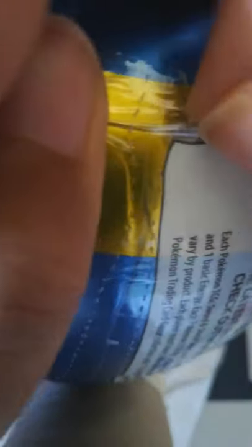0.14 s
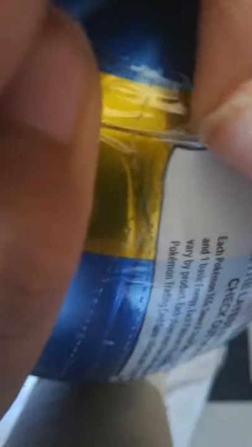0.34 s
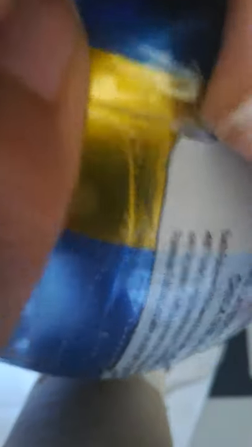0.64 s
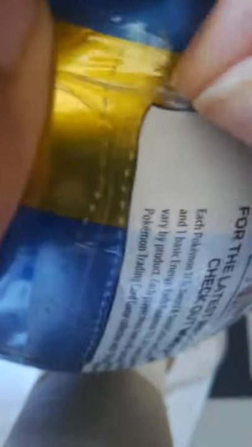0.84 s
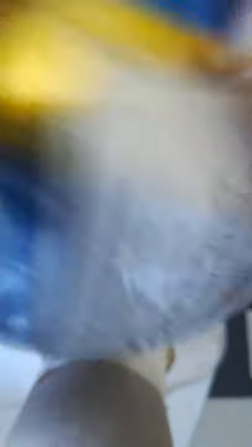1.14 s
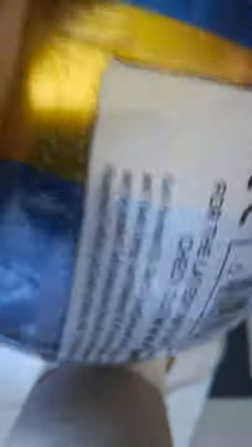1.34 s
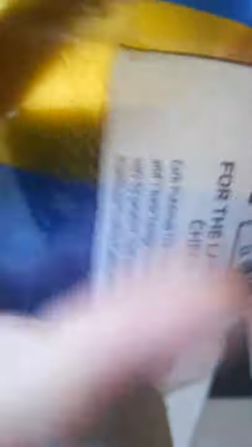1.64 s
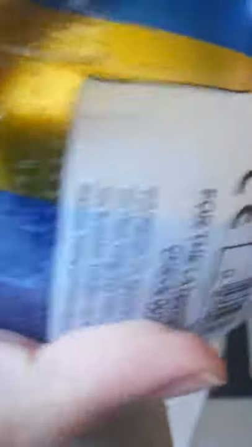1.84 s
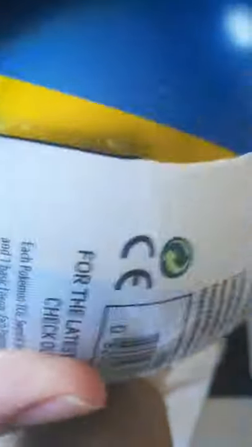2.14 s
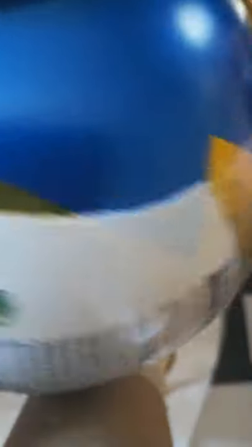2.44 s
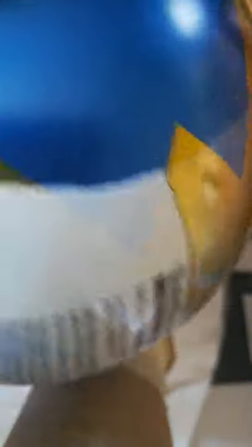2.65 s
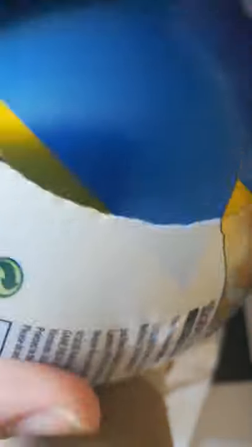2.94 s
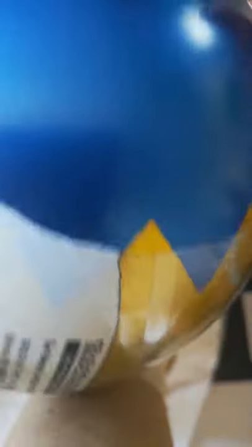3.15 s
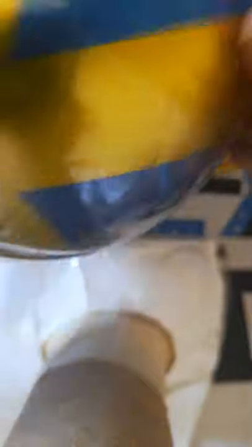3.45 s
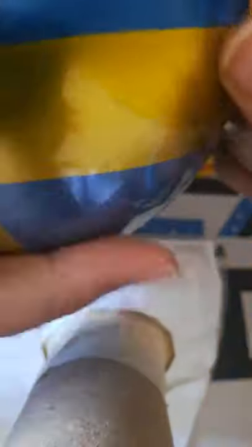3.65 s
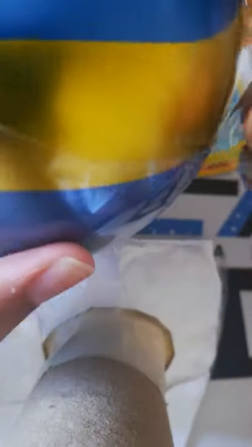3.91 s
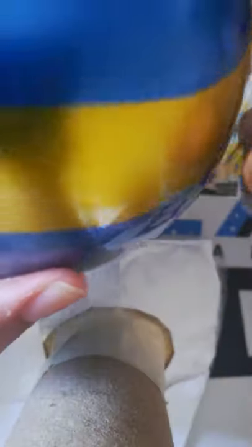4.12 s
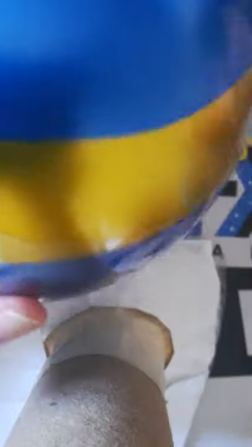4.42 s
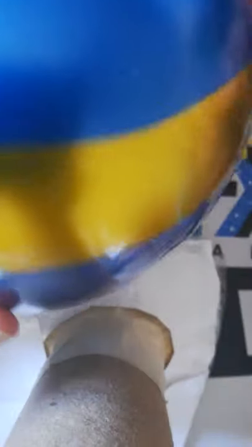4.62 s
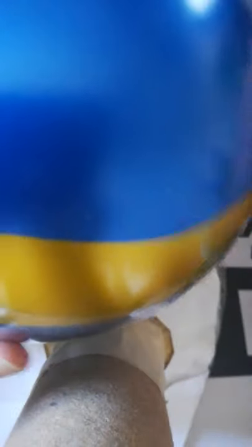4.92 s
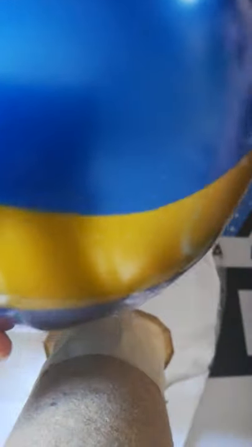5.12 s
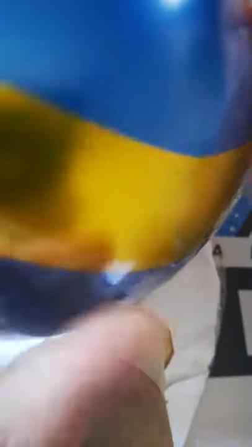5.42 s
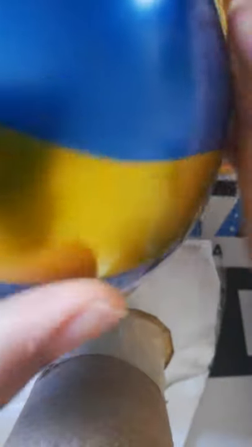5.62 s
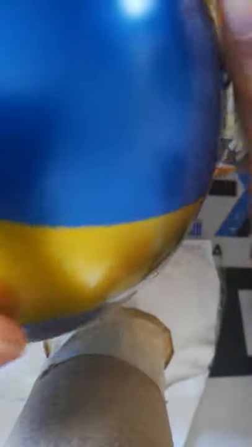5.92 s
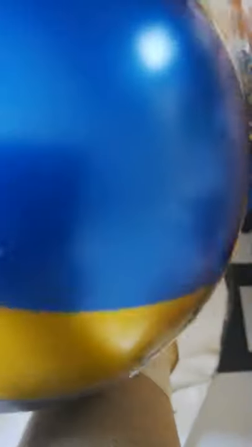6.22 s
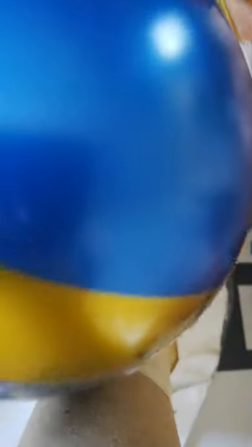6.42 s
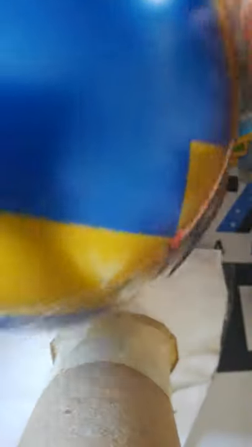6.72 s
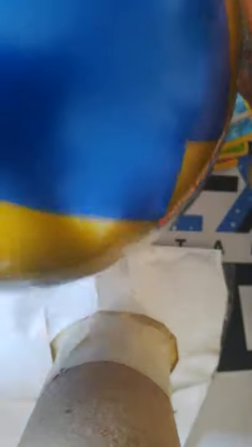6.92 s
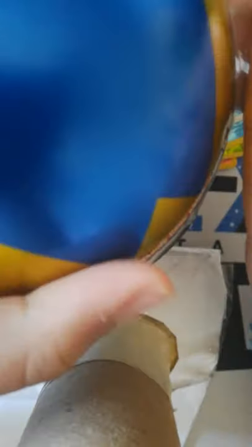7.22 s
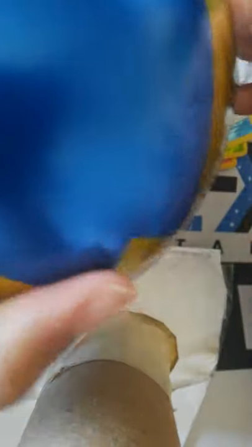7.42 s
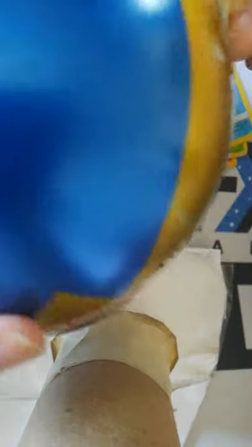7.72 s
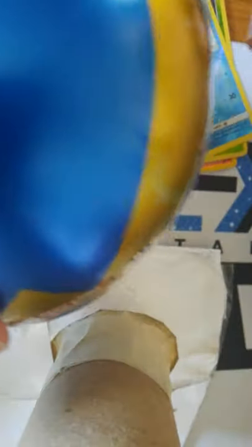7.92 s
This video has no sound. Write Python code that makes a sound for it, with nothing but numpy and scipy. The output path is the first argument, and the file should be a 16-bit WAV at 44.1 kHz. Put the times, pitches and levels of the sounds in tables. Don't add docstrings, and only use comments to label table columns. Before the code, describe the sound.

A close stereo pickup in a small room, with quiet air, faint low hum and grip rumble throughout. For the first second there are only tiny ticks and one clear snap near 0.6 s. At 1.2 s the film starts to give with sharp dry cracks, another at 1.5, then a strong cluster at 2.1 to 2.5. Faint squeaks of film on metal follow around 2.4 to 2.7, light shell taps at 2.8 to 2.9, and more crackle at 3.4 to 3.8. A hard burst at 4.2 brings short squeaks to 4.5; snaps keep coming from 4.8 to 5.9, one very loud at 5.45. From 6.05 to 6.9 the wrap crumples densely, with brief hollow tin rings and clanks. After a lull, bright crackling returns at 7.3, with loud snaps and a low thud at 7.6, and a last burst near 7.9.

```python
import sys
import numpy as np
from scipy import signal
from scipy.fft import rfft, irfft, next_fast_len
from scipy.io import wavfile
from scipy.ndimage import uniform_filter1d

SR = 44100
rng = np.random.default_rng(int(sys.argv[2]) if len(sys.argv) > 2 else 0)


def rack_gain(trim_db):
    fader = np.asarray(trim_db, float)
    return 10 ** (fader / 20)


def unload_wav(signal):
    wavfile.write(
        sys.argv[1],
        SR,
        np.round(np.clip(np.atleast_2d(signal).T, -1, 1) * 32767).astype(np.int16),
    )


N = 355446
SIZE = 1024
USUAL_MID_DB, USUAL_LOW_DB = -6, -9

# hz, level_db
FILM = [(240, -19), (400, -17.5), (681, -15), (835, -8), (1690, -9), (2140, -6.5), (2700, -6.5),
        (4000, -4.5), (4390, -3), (6100, -4), (7240, 3), (9450, -6.5), (11100, -17), (15100, -19.5),
        (16900, -61)]
# start_s, mid_db, low_db, left_minus_right_db
TURN = [(1.201, -15.5, -12, 8), (3.1, -7, -14, 1.5), (3.501, -14, -20, 5), (4.5, -6, -13, -9),
        (5.3, 0.5, -19.5, 1), (6.7, -7, -17, -5.5), (7.6, -10.5, -8.5, 6)]


def shape(hz, table):
    table_hz, table_db = np.transpose(table)
    return np.interp(np.log(hz + 1), np.log(table_hz), table_db)


def colour(x, table):
    length = x.shape[-1]
    n = next_fast_len(length)
    gain = rack_gain(shape(np.fft.rfftfreq(n, 1 / SR), table))
    y = irfft(rfft(x, n) * gain, n)[..., :length]
    return y / np.sqrt(np.mean(y ** 2))


def causal(db):
    fold = np.r_[1, 2 * np.ones(SIZE // 2 - 1), 1, np.zeros(SIZE // 2 - 1)]
    cepstrum = irfft(db * np.log(10) / 20, SIZE)
    return np.exp(rfft(cepstrum * fold))


def add(out, s, sounds):
    for start, sound in zip((s * SR).astype(int), sounds):
        n = min(sound.shape[-1], N - start)
        out[:, start:start + n] += sound[:, :n]


def walk(rate):
    k = int(SR / rate)
    held = np.repeat(rng.standard_normal(N // 200), k)[:N]
    return 1.88 * uniform_filter1d(held, k)


def ringing(modes, flicker_db, rate):
    n = next_fast_len(N)
    hz, noise = np.fft.rfftfreq(n, 1 / SR), rfft(rng.standard_normal(N), n)
    y = np.zeros(N)
    for mode_hz, width_hz, db in modes:
        resonance = 1 / (1 + (2 * (hz - mode_hz) / width_hz) ** 2)
        y += rack_gain(db + flicker_db * walk(rate)) * irfft(noise * resonance, n)[:N]
    return y / np.sqrt(np.mean(y ** 2))


def hands():
    # (time to die by 20 dB
    tugs = [(.485, -55, -0.05), (1.216, -38.5, -0.08), (1.3, -54, -0.06), (1.7, -59, -0.15),
            (1.93, -76, -2), (2.102, -44.5, 0.1), (2.28, -53, 0.4), (2.551, -62, 0.2), (2.95, -55.5, 0.5),
            (3.127, -44.5, 0.1), (3.369, -40.5, -0.05), (3.43, -49, 0.1), (3.521, -48.5, 0.3),
            (3.74, -70, 0.1), (4.25, -48.5, 0.36), (4.441, -39.5, 0.08), (4.6, -68, -4.2),
            (4.961, -38.5, -0.04), (4.98, -55, 0.5), (5.15, -48, -1.15), (5.422, -49, 0.6),
            (5.761, -41, -0.34), (6.103, -33, 0.02), (6.158, -41.5, 0.19), (6.66, -45, 0), (6.8, -59, 0.5),
            (7.348, -38, 0.06), (7.62, -42.5, 0.26), (7.87, -42, 0.16)]
    rest_db = -74.5
    rise_s, rise_share = .02, 0.21
    t, power = np.arange(N) / SR, rack_gain(2 * rest_db)
    for s, db, fall_s in tugs:
        fall_s = max(fall_s, .01)
        away = np.maximum((t - s) / fall_s, (s - t) / (rise_s + rise_share * fall_s))
        power = power + rack_gain(2 * (db - 20 * away))
    return 10 * np.log10(power)


def floor(rustle_db):
    # hz, level_db
    air_colour = [(15, -47), (25, 5), (121, -5.5), (147, -11), (392, -11.5), (462, -19.5), (1370, -17),
                  (1760, -20), (2130, -20), (7650, -25), (16900, -38)]
    # pitch_hz, width_hz, level_db
    hum_modes = [(60, 3.8, 0), (123.4, 11.4, -2.5), (243.7, 7.8, -9.5)]
    grip_colour = [(15, -54), (40, -15.5), (120, -10.0), (250, -4.0), (450, -20.5), (900, -29.0)]  # hz, level_db
    air_db, hum_db, rumble_db = -65, -71.5, -70
    mid, side = rng.standard_normal((2, N))
    side = 1.2 * signal.sosfilt(signal.butter(1, 250, "high", fs=SR, output="sos"), side)
    air = rack_gain(air_db) * colour(np.array([mid + side, mid - side]), air_colour)
    hum = rack_gain(hum_db) * ringing(hum_modes, flicker_db=0.9, rate=3.5)
    grip = colour(rng.standard_normal((2, N)), grip_colour)
    grip = grip[0] + 0.26 * grip[1] * np.array([[1], [-1]])
    grip_db = rumble_db + 0.4 * (rustle_db + 59.0) + 2.2 * walk(16)
    return air + hum + rack_gain(grip_db) * grip


def room(x, poses=4):
    # hz, level_db
    answer = [(240, -77), (400, -12.5), (692, -16.5), (1200, -8.5), (3110, -11), (4190, -11.5),
              (6390, -9.5), (7800, -3), (9910, -19.5), (15400, -23), (16900, -79.5)]
    room_db, gap_s, rise_s, t60_s, treble_t60_s = -19.5, 0.0075, 0.02, 0.35, 0.2
    near_db, near_share = -13.5, 0.17
    t, out = np.arange(SR // 2) / SR, np.zeros((2, N))
    swell = np.clip((t - gap_s) / rise_s, 0, 1)
    tint = [(hz, db - shape(hz, FILM)) for hz, db in answer]
    x = x.sum(0)
    nearness = uniform_filter1d(x ** 2, size=128) / rack_gain(2 * near_db)
    x = x / (1 + nearness) ** (near_share / 2)
    pose = np.repeat(rng.integers(0, poses, N // SIZE + 1), SIZE)[:N]
    lowpass = signal.butter(4, 9500, fs=SR, output="sos")
    for k in range(poses):
        tail = colour(rng.standard_normal((2, len(t))), tint)
        dull = signal.sosfiltfilt(lowpass, tail)
        tail = swell * (dull * rack_gain(-60 * t / t60_s) + (tail - dull) * rack_gain(-60 * t / treble_t60_s))
        tail /= np.sqrt(np.sum(tail ** 2) / 2)
        out += signal.oaconvolve((x * (pose == k))[None], tail, axes=1)[:, :N]
    return rack_gain(room_db) * out


def knocks(rows, gain_db, right):
    out, t = np.zeros((2, N)), np.arange(SR // 4) / SR
    rows, rings = np.array(rows), []
    for _, db, hz, t60_s in rows:
        decay = rack_gain(-60 * t / max(t60_s, .01))
        onset = 1 - np.exp(-t * hz * 3.9)
        tone = np.sin(2 * np.pi * hz * t) * decay * onset
        rings.append(rack_gain(db + gain_db) * tone * np.array([[1], [right]]))
    add(out, rows[:, 0], rings)
    return out


def finger_thuds():
    # start_s, peak_db, pitch_hz, t60_s
    thuds = [(1.183, -52, 136, 0.093), (1.209, -55, 165, 0.2), (1.929, -59, 107, 0.073),
             (2.931, -54, 77, 0.083), (3.219, -51, 68, 0.045), (3.48, -67, 120.7, 0.4),
             (3.649, -52, 45.8, 0.04), (4.2, -55.5, 60, 0.069), (6.141, -31, 210, 0.017),
             (6.16, -54, 67, 0.073), (7.22, -56.5, 82.5, 0.078), (7.584, -15.5, 60, 0.0084),
             (7.69, -61, 111, 0.21), (7.874, -35.5, 70, 0.019), (1.7, -57.5, 108, 0.069)]
    return -knocks(thuds, 17, right=0.74)


def tin_rings():
    # start_s, peak_db, pitch_hz, t60_s
    rings = [
        (0.596, -52, 1320, 0.077),
        (6.137, -35.5, 1146, 0.065),
        (6.196, -35, 813, 0.056),
        (6.35, -27.5, 870, 0.042),
        (6.376, -32.5, 833, 0.083),
        (6.585, -26, 1020, 0.022),
    ]
    # start_s, peak_db, pitch_hz, t60_s
    pops = [(1.2775, -20.5, 2050, 0.0091), (1.4816, -22, 2140, 0.005), (2.1082, -17, 2310, 0.008),
            (4.9642, -23, 2050, 0.016), (0.5958, -20, 9000, .006), (5.324, -19, 5600, 0.022),
            (5.1, -15.5, 4670, .007), (6.35, -20.5, 7500, .006), (6.6655, -18, 2090, 0.013),
            (1.2785, -20, 8500, .005), (6.3765, -14, 7000, .006), (5.4503, -16, 9300, .005),
            (6.8, -18, 4500, .007)]
    # start_s, peak_db, pitch_hz, t60_s
    taps = [
        (2.805, -33, 640, 0.01),
        (2.937, -28, 363, 0.0083),
    ]
    return knocks(np.vstack([rings, pops, taps]), 8.5, right=-0.25)


def rubbing():
    # start_s, length_s, pitch_hz, glide_hz_per_s, level_db
    squeaks = [(2.415, 0.16, 1380, -4, -58), (2.42, 0.1, 3350, -5, -60), (2.517, .2, 2740, 403, -64.5),
               (2.545, 0.15, 700, 98, -67), (2.619, .07, 1390, 0, -67), (2.63, 0.058, 3390, 610, -60),
               (3.35, 0.06, 1305, -0.5, -65), (3.347, .04, 943, 0, -63.5), (3.464, 0.069, 7900, -600, -49),
               (3.485, 0.071, 3220, -4, -55.5), (3.509, .03, 1780, 0, -52), (4.25, 0.056, 1200, -0.5, -50),
               (4.32, 0.041, 1390, 300, -47), (4.32, 0.044, 2870, 4000, -50),
               (4.377, 0.06, 1420, -900, -47), (4.44, .025, 620, -0.5, -48), (4.459, 0.015, 950, 0, -44.5),
               (2.418, .07, 720, 0, -66), (4.387, 0.023, 5250, 0, -48), (4.383, 0.026, 7800, 9, -48),
               (4.414, 0.048, 6980, -2000, -37), (4.44, 0.04, 3500, 1500, -48),
               (4.468, 0.048, 1370, 3000, -44), (6.151, 0.024, 7900, -1000, -35.5),
               (6.154, 0.02, 5300, 0, -38), (6.182, 0.023, 1830, 0, -41)]
    width, steady, right = .06, .1, 0.57
    out, rows, songs = np.zeros((2, N)), np.array(squeaks), []
    for chance, (_, length_s, hz, glide, db) in zip(rng.standard_normal((len(rows), 2, SR // 2)), rows):
        t = np.arange(int(np.clip(length_s, .01, .25) * SR)) / SR
        k = int(SR / (width * hz + 40.0))
        waver = uniform_filter1d(uniform_filter1d(chance[0] + 1j * chance[1], k), k)[k:k + len(t)]
        carrier = np.exp(2j * np.pi * (hz * t + glide * t ** 2 / 2))
        song = np.real((steady + waver * np.sqrt(k)) * carrier)
        swell = np.sqrt(np.sin(np.pi * t / t[-1]).clip(0))
        songs.append(rack_gain(db) * song * swell * np.array([[1], [right]]))
    add(out, rows[:, 0], songs)
    return out


def sliding(rustle_db):
    hiss_db = -3
    film, shared = colour(rng.standard_normal((2, N)), FILM), walk(33)
    below = [signal.sosfilt(signal.butter(1, hz, fs=SR, output="sos"), film) for hz in (1200, 2500, 5000, 9500)]
    bands = np.diff([0 * film, *below, film], axis=0)
    patchy = sum(rack_gain(4.13 * walk(30)) * band for band in bands)
    return rack_gain(rustle_db + hiss_db + 1.87 * shared) * patchy


def cracks(s, db, mid_db, low_db, pan_db, ms):
    # start_s, top_db
    sheen = [(1.2, 2.5), (1.48, -7), (2.1, 5.5), (2.5, 3.5), (2.91, -11), (3.45, 3.5), (3.75, -1.5),
             (4.5, 2), (4.88, -6), (5.12, 4.5), (5.33, -8), (5.45, 3), (5.66, -10), (5.79, 8), (5.87, 4),
             (6.35, -11.5), (6.76, -3), (7.56, 4.5)]
    # start_s, right_port_lag_s
    port_lag = [
        (1.0, 0.00051),
        (2.4, 0.00056),
        (3.4, 0.0007835),
        (8.0, 0.00075),
    ]
    lead_s, rise_s, scatter = .004, .00025, .1
    alike, strike, sharp_db = 0.63, 3, 1.5
    echo, echo_s = .4, .0015
    t, hz = np.arange(SIZE) / SR - lead_s, np.fft.rfftfreq(SIZE, 1 / SR)
    chance = rng.standard_normal((len(s), 3, SIZE))
    tau = np.clip(ms, .2, 5)[:, None, None] / 1000
    fall = np.exp(-abs(t) / tau) + scatter * np.exp(-abs(t) / (5.7 * tau))
    rise = np.exp(-abs(t) / rise_s) + 0.22 * np.exp(-abs(t) / 0.00047)
    burst = alike * chance[:, :1] + np.sqrt(1 - alike ** 2) * chance[:, 1:]
    burst = burst * np.where(t < 0, rise, fall)
    burst[:, :, int(lead_s * SR)] += strike * np.sign(chance[:, :1, 0])
    late = int(echo_s * SR)
    burst[:, :, late:] += echo * burst[:, :, :-late]

    octave = np.log2((hz + 1) / 8000)
    mid = np.clip(1 - abs(octave + 0.89) / 1.39, 0, 1)
    low = np.clip(-(octave + 0.92) / 1.12, 0, 1)
    tone_db = shape(hz, FILM) + (mid_db - USUAL_MID_DB)[:, None] * mid
    tone_db += (low_db - USUAL_LOW_DB)[:, None] * low
    sheen_db = np.interp(s, *np.transpose(sheen))[:, None] + sharp_db * chance[:, 0, :1]
    tone_db += sheen_db * np.clip(octave / .5, 0, 1)
    raw = rfft(burst)
    tone_db -= 10 * np.log10(uniform_filter1d(np.mean(abs(raw) ** 2, axis=1), size=40, axis=1))

    lag_s = np.interp(s, *np.transpose(port_lag))[:, None, None] * np.array([[0], [1]])
    delay = np.exp(-2j * np.pi * hz * lag_s)
    sound = irfft(raw * causal(tone_db)[:, None] * delay, SIZE)
    sound /= np.sqrt(np.mean(sound ** 2, axis=2, keepdims=True) * SIZE / SR / tau)
    gain = rack_gain(db[:, None] + pan_db[:, None] * [.5, -.5])
    out = np.zeros((2, N))
    add(out, np.clip(s - lead_s - .0007, 0, None), sound * gain[:, :, None])
    return out


def swarm(rustle_db, per_s=600, spread_db=7.0):
    swarm_db = -5
    u = rng.random((5000, 6))
    s = np.cumsum(-np.log(1 - u[:, 0])) / per_s
    inside = s < (N - 1) / SR
    u, s = u[inside], s[inside]
    db = rustle_db[(s * SR).astype(int)] + swarm_db - spread_db * np.log(1 - 0.87 * u[:, 1])
    mid_db = USUAL_MID_DB + 14 * (u[:, 2] - .5)
    low_db = USUAL_LOW_DB + 16 * (u[:, 3] - .5)
    return cracks(s, db, mid_db, low_db, pan_db=10 * (u[:, 4] - .5), ms=0.091 + 0.9 * u[:, 5])


def faint():
    # start_s, peak_db, darkness_db
    faint_creases = [(0.3743, -57, 0.5), (0.4116, -56, 3), (0.4329, -58, 0.5), (.304, -60, 2), (0.4678, -47, -1),
                     (.517, -54, -3), (.795, -59, -8), (0.4816, -48, 2), (0.496, -47, -1), (1.1883, -34.0, 7),
                     (1.2088, -44, -2), (1.2198, -33, 8), (1.293, -31.5, 7), (1.336, -40.5, 9),
                     (1.4343, -56.0, 0.5), (1.4733, -54, 0.5), (1.599, -54, 20), (1.697, -45.5, 15),
                     (1.707, -51, 0), (1.9703, -45.5, -3), (2.0923, -29, 0), (2.163, -28.5, 3), (2.346, -34.5, 10),
                     (2.535, -44, 0.5), (2.6047, -33.5, -6), (2.8048, -41.5, 1.5), (3.0825, -42, -3),
                     (3.166, -42, -8), (3.2599, -42.5, 1), (3.2771, -39.5, -12), (3.2998, -46, -11),
                     (3.354, -41, -1), (3.3608, -38, 6), (3.3669, -34, 0.5), (3.3693, -32, 0), (3.376, -33.5, 0.5),
                     (3.397, -39, 2), (3.6981, -35, -3), (3.927, -44, -4), (3.9478, -47, -6), (4.0424, -51, 1),
                     (4.108, -45, 17), (4.1502, -47.5, -11), (4.217, -26, -4), (4.2236, -12.5, -2),
                     (4.2811, -43, -6), (4.375, -37, 2), (4.4163, -31, -6), (4.4474, -31, -6), (4.589, -37, 10),
                     (4.627, -49.0, 0.5), (4.6441, -50.0, 0.5), (4.6722, -43, 9), (4.6943, -48.0, 5),
                     (4.943, -42.0, 0.5), (5.139, -23, -9), (5.2486, -42.0, 0.5), (5.4208, -35, -1),
                     (5.563, -42, 13), (5.639, -39, 0.5), (5.8185, -33, 3),
                     (5.329, -23, 2), (5.343, -38, -4), (5.5045, -22, -3), (5.624, -43, -8), (5.778, -32, 5),
            (6.0027, -49, -12), (6.0436, -43, -1), (6.1059, -35.5, -2), (6.1191, -37, 1),
            (6.2771, -34.5, 2), (6.3006, -40, -6), (6.4145, -40, -3), (6.4362, -36.5, -3),
            (6.5678, -53.0, 0.5), (6.593, -30, 5), (6.7274, -31, 2), (7.048, -41.5, 0), (7.21, -40.5, 17),
            (7.22, -46, 6), (7.2345, -50.0, 2), (7.2659, -49, 4), (7.614, -31, -1), (7.6506, -23, 0),
            (7.7982, -36.5, 6)]
    s, db, dark_db = np.array(faint_creases).T
    turn_s, _, _, turn_pan_db = np.transpose(TURN)
    mid_db = USUAL_MID_DB + dark_db
    low_db = USUAL_LOW_DB - 5.0 + 1.57 * dark_db
    return cracks(s, db + 1.5, mid_db, low_db, np.interp(s, turn_s, turn_pan_db), ms=0.63 + 0 * s)


def ticks():
    # start_s, peak_db
    lesser_creases = [(1.223, -27.5), (1.231, -31.5), (1.2372, -29.5), (1.314, -34.5), (1.4177, -38.5), (1.9186, -32),
                      (1.934, -27), (1.936, -30), (2.071, -28.5), (2.0834, -23), (2.1017, -35), (2.1157, -27),
                      (2.1366, -28.5), (2.248, -31), (2.2525, -24), (2.283, -21), (2.296, -32), (2.362, -35),
                      (2.5872, -28), (2.6314, -34), (2.7524, -31), (3.062, -33.5), (3.121, -31), (3.161, -41),
                      (3.226, -40), (3.2558, -46), (3.4187, -34), (3.7412, -32), (3.7452, -22), (3.7835, -29),
                      (4.2121, -21), (4.22, -17), (4.276, -34), (4.3312, -44), (4.3962, -39), (4.4372, -31),
            (4.4254, -24), (4.4504, -31), (4.4768, -21.5), (4.6159, -32.5), (4.652, -41), (4.664, -30),
            (4.7096, -37), (4.762, -34), (4.7708, -23.5), (4.977, -23.5), (4.9883, -24.5), (4.997, -24.5),
            (5.0844, -27.5), (5.1126, -33), (5.1358, -20), (5.215, -29), (5.256, -34), (5.273, -34),
            (5.2773, -22), (5.311, -28), (5.3159, -32), (5.4418, -35), (5.695, -24), (5.7715, -21),
            (5.9848, -29),
                      (6.0508, -33), (6.0657, -36), (6.07, -22.5), (6.125, -19), (6.1616, -26), (6.173, -28),
               (6.364, -40), (6.634, -31), (6.6441, -20), (6.66, -24), (6.6898, -25), (6.6939, -24.5),
               (6.701, -24), (6.7234, -30), (6.735, -39), (6.7735, -22.5), (6.796, -28.5), (6.818, -36),
               (6.8324, -36), (7.244, -37.5), (7.2999, -34), (7.3214, -39), (7.336, -22.5), (7.347, -23),
               (7.367, -22.5), (7.56, -29), (7.636, -30.5), (7.7346, -33), (7.771, -29), (7.8283, -38),
               (7.837, -33), (7.844, -25), (7.8619, -18.5), (7.973, -30)]
    spread_db = 3
    s, db = np.array(lesser_creases).T
    turn_s, *turn_columns = np.transpose(TURN)
    off_db = spread_db * rng.standard_normal((3, len(s)))
    pose = [np.interp(s, turn_s, column) + off for column, off in zip(turn_columns, off_db)]
    return np.array([s, db, *pose])


def snaps():
    # start_s, peak_db, mid_db, low_db,
    # left_minus_right_db
    big_creases = [(0.5965, -15, -16.5, -27.5, 12), (0.909, -36, -12, -29.5, 9), (1.184, -10.5, -9.5, -18, 3.5),
                   (1.2116, -27, -6, -11, 17), (1.279, -14, -18.5, -24.5, 7.5),
                   (1.4824, -22.5, -23.5, -21.5, 20), (1.9, -32, 1, -1, 6), (2.0887, -16.5, -19, -35.5, 2),
                   (2.1093, -6, -7.5, -22.5, 3), (2.257, -22, 6, -4.5, 14), (2.2663, -15, -18, -13, 5),
                   (2.287, -17, 15, 6, 11.5), (2.5, -12.5, -18, -19.5, 2.5), (2.91, -15, -14.5, -19, -0.5),
                   (2.936, -28.5, -1, 2, 1.5), (3.374, -32.5, -27, -27, 15), (3.4247, -23.5, -13, -45, -2),
                   (3.4568, -15.5, -22, -33, 1), (3.5492, -13.5, -6.5, -12.5, 3.5),
                   (3.7094, -19.5, -16, -30, 2), (3.7243, -18, 10.5, -4.5, 5), (3.76, -13, -6.5, -19, 2),
                   (3.778, -24.5, 10, -2, 14), (3.9304, -31, -16, -57, -7.5),
                   (4.1993, -5.5, -3.5, -12.5, -2), (4.2257, -7, 5, -10, 2), (4.2409, -20.5, -48, -44, 12),
               (4.3497, -22.5, -7, -12, 2), (4.4669, -22, -14, -6, 10.5), (4.4991, -14, -6, -9, 5.5),
               (4.583, -31.5, 5.5, 7, -2), (4.777, -13, -5, -22, -10), (4.7818, -9.5, -5, -18.5, -6.5),
               (4.8802, -17, 8, -15.5, 0), (4.966, -15.5, 4, -13, 4.5), (5.0976, -14.5, -6, -23, 7),
               (5.1086, -21, 9, -7, -6), (5.1266, -10.5, -0.5, -21, -6.5), (5.1987, -22, 6, -12.5, 10.5),
               (5.3256, -15, -1, -23, -2), (5.4515, -3, 19, -47, -1), (5.502, -21.5, -8, -25, -4),
               (5.586, -16.5, 7, -12.5, 8), (5.6605, -26, -0.5, 2, 3), (5.7293, -15.5, -5, -14.5, 2.5),
               (5.753, -16.5, 6, -2.5, 4), (5.7888, -20, -3, -16.5, 9.5), (5.875, -29, 9, -14, -11),
                   (6.0746, -15.5, -8, -16, 0), (6.098, -20, -20, -11, 5.5), (6.1412, -15.5, -7, 6, 3),
                 (6.1975, -7.5, -6, -14.5, -2), (6.3517, -15.5, 2, -3.5, -2.5),
                 (6.3774, -8.5, -5.5, -14, -1), (6.587, -17, 1, 0.5, -1.5), (6.6087, -5, -2, -17, -0.5),
                 (6.6655, -13, 9, 2, -2), (6.7487, -19, 3, -46, -3), (6.7595, -2, -4.5, -18, 5.5),
                 (6.845, -8.5, -1, -22.5, 8), (6.8907, -17.5, 5, -9, 13), (7.099, -35, 22.5, 21.5, 6),
                 (7.2861, -11, -1, -14, -2), (7.34, -13.5, -8, -46, -1.5), (7.374, -16, -1, -18.5, 3),
                 (7.5642, -14.5, -19, -22.5, 10.5), (7.5846, -3, -1.5, -11, 9), (7.618, -22, -8, -8.5, 14),
                 (7.6546, -16.5, -11, -16.5, 16.5), (7.8163, -27, 7, 16, 3.5),
                 (7.8475, -21.5, -4, -10, 26.5), (7.8752, -4, -5, -13, 6)]
    creases = np.hstack([np.array(big_creases).T, ticks()])
    snap_ms = 0.73 * rack_gain(2.36 * rng.standard_normal(creases.shape[1]))
    return cracks(*creases, snap_ms)


def scene():
    rustle_db = hands()
    film = snaps() + swarm(rustle_db) + sliding(rustle_db) + faint()
    tin = tin_rings() + finger_thuds() + rubbing()
    return film + room(film) + tin + floor(rustle_db)


def roll_off(x):
    return signal.sosfilt(signal.butter(12, 17020, fs=SR, output="sos"), x)


def record(dry):
    top = signal.ellip(8, .1, 70, 16800, fs=SR, output="sos")
    mix = signal.sosfilt(top, np.clip(dry, -.8, .8))
    return roll_off(mix)


dry = scene()
out = record(dry)
unload_wav(out)
```